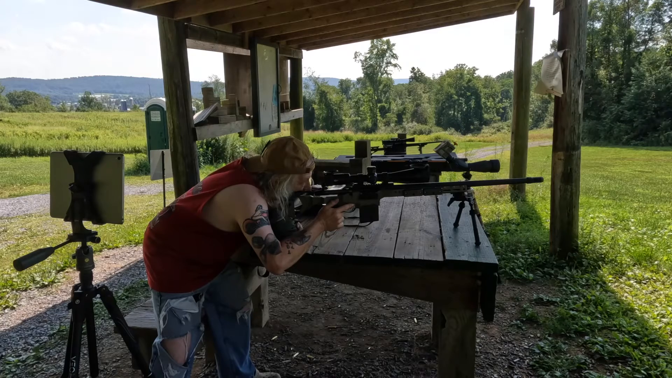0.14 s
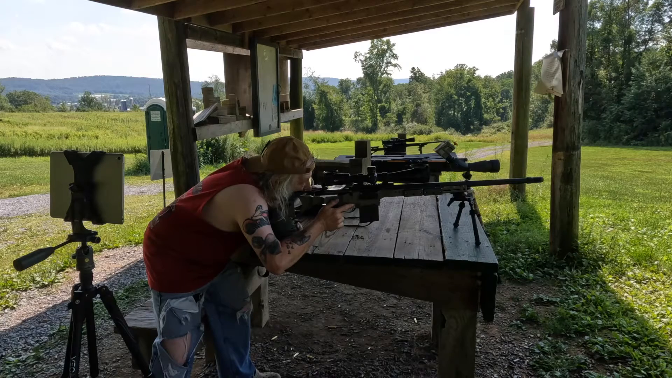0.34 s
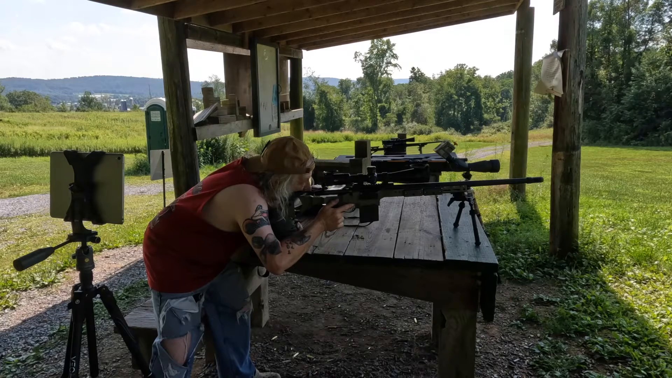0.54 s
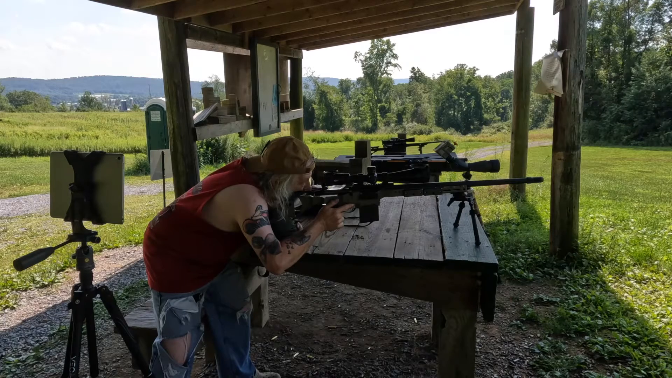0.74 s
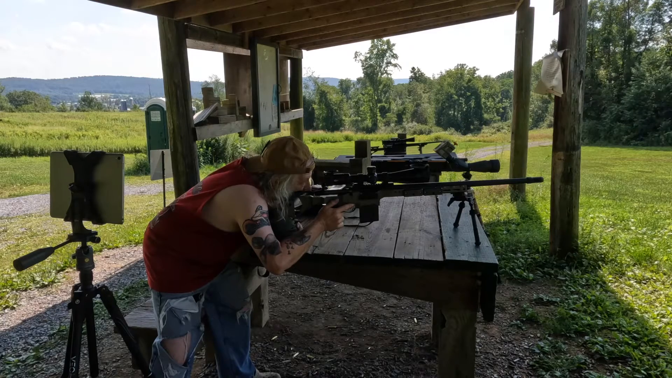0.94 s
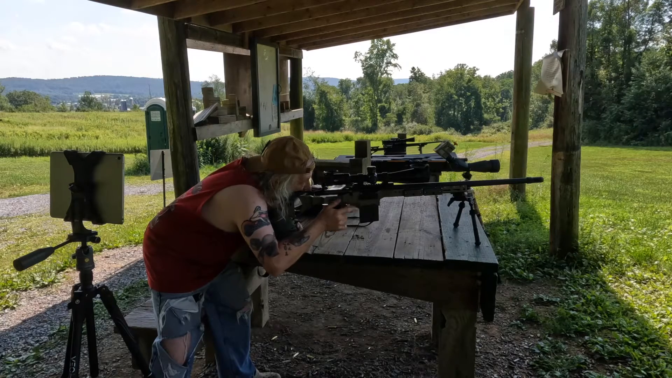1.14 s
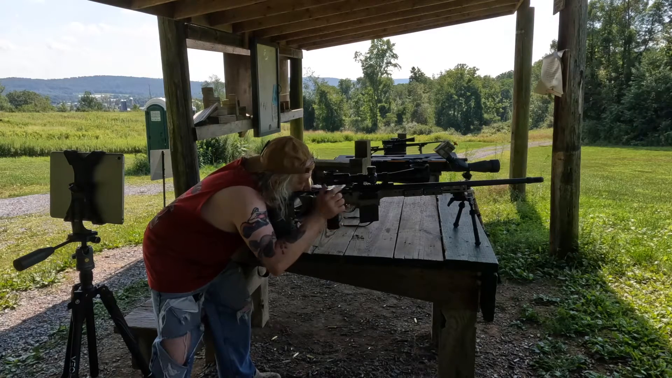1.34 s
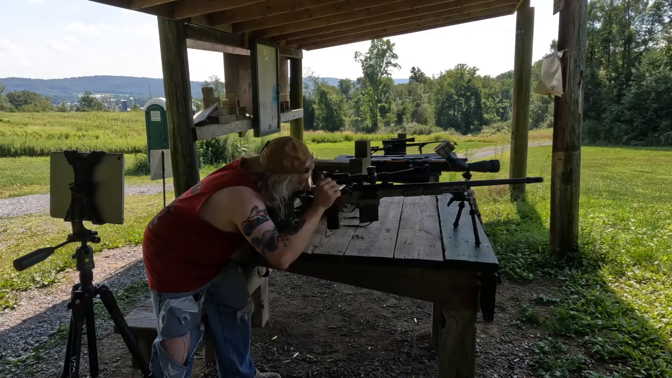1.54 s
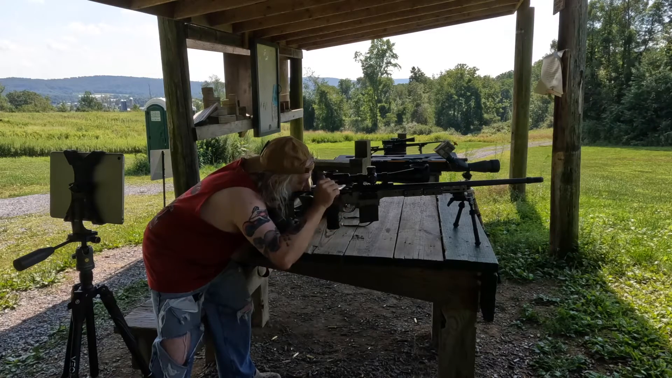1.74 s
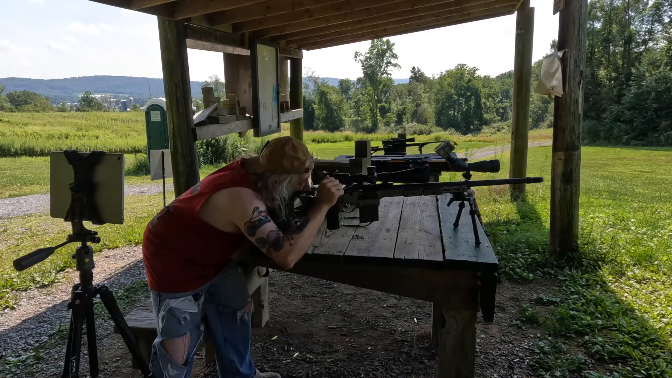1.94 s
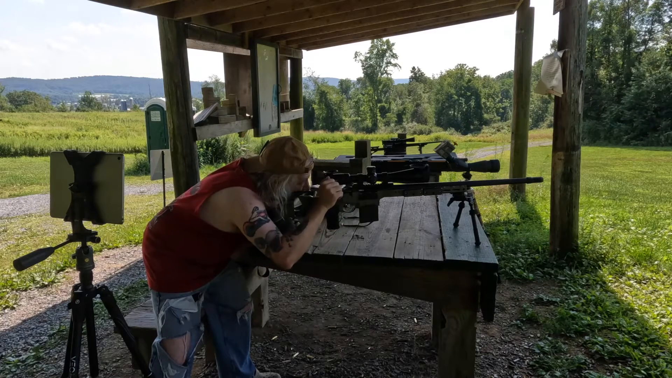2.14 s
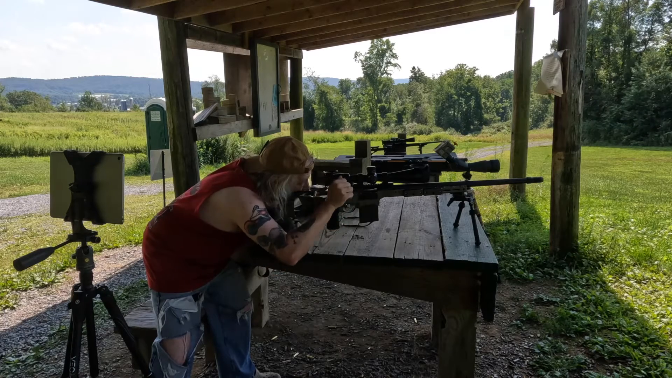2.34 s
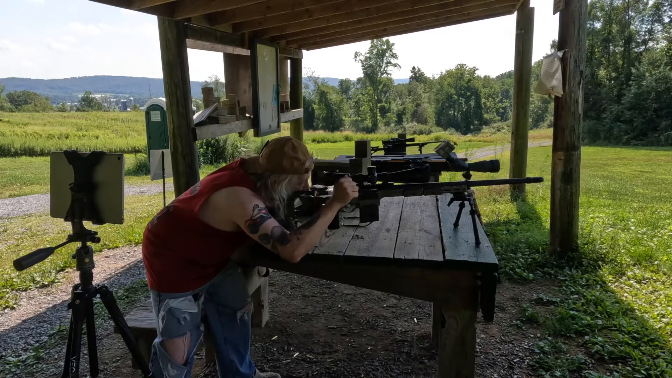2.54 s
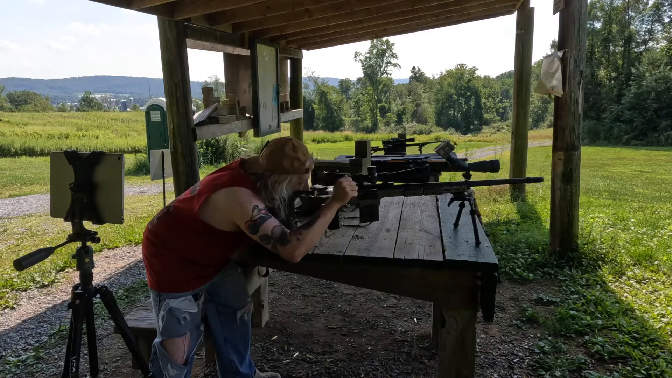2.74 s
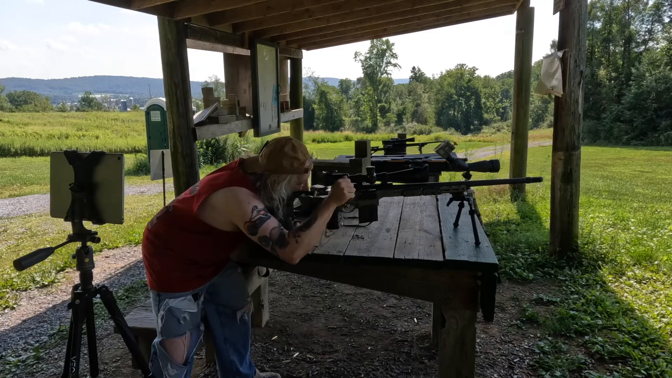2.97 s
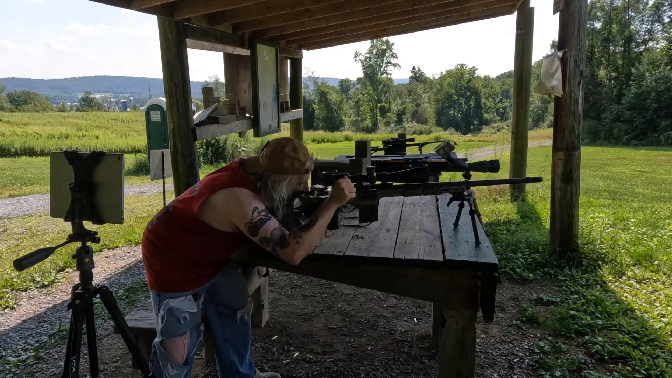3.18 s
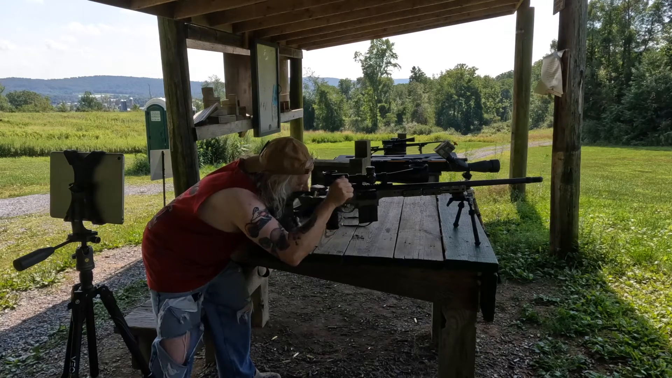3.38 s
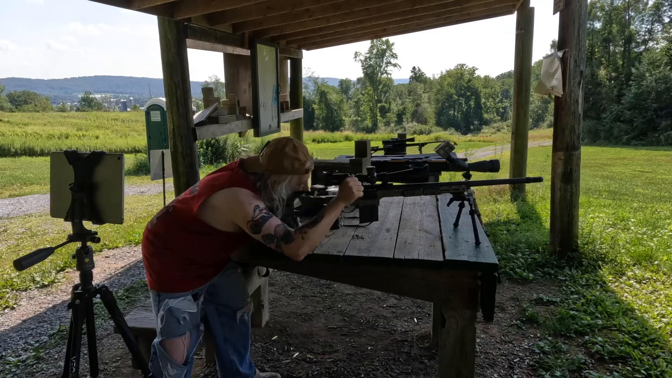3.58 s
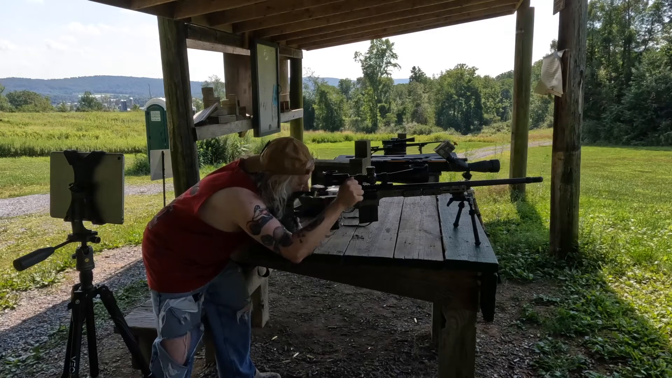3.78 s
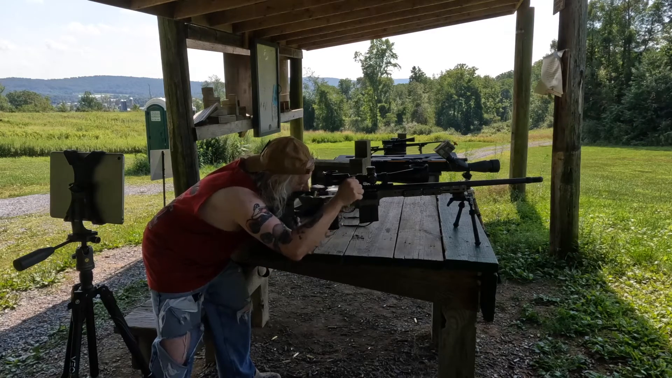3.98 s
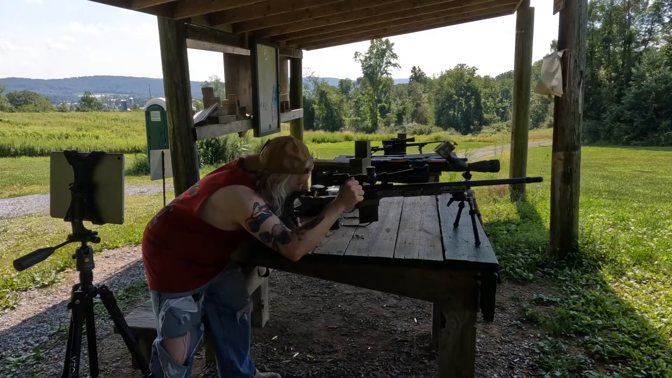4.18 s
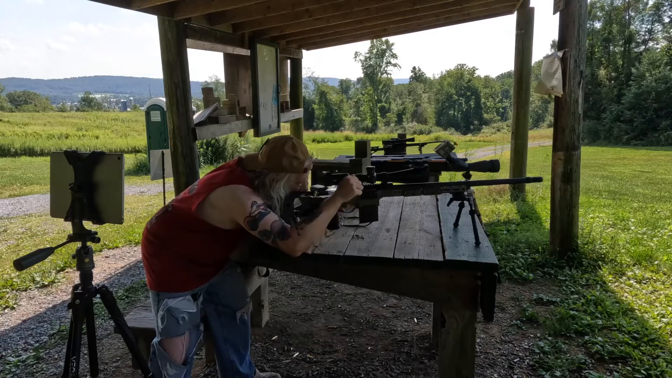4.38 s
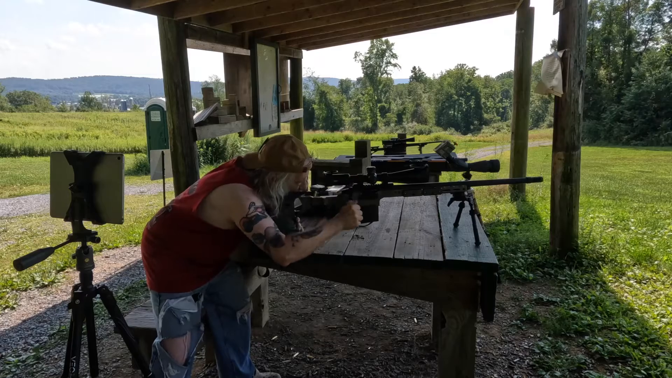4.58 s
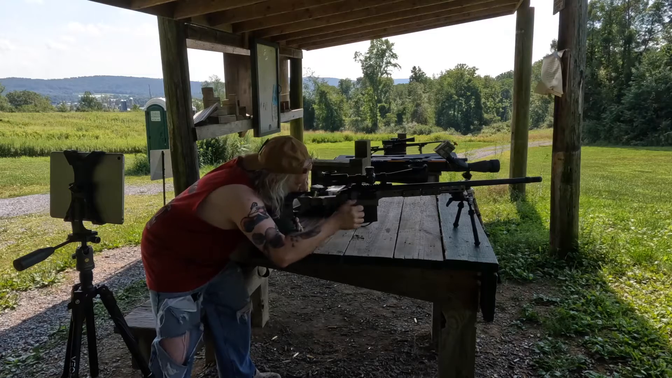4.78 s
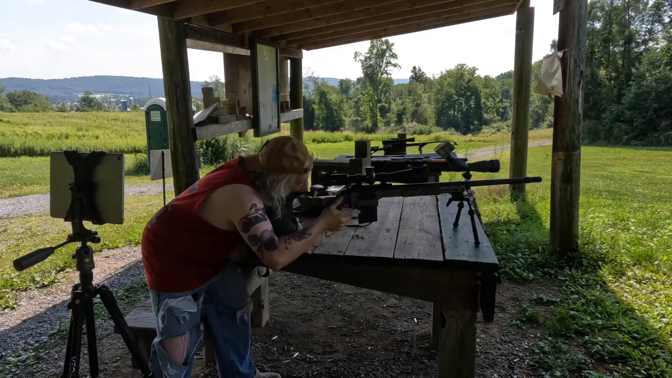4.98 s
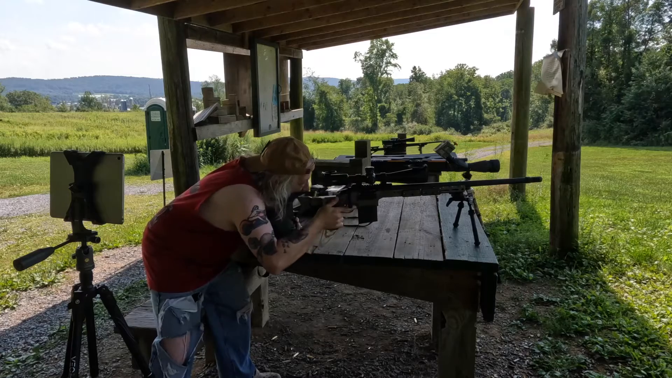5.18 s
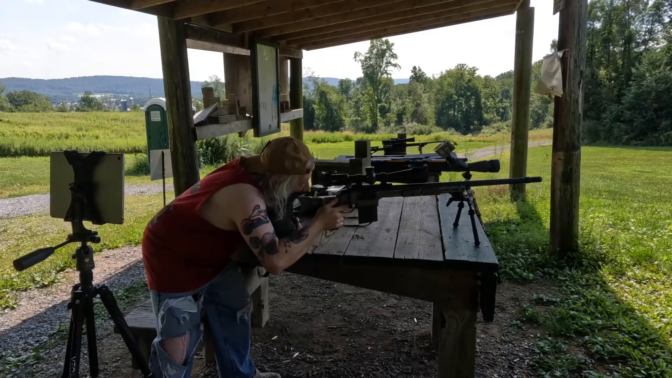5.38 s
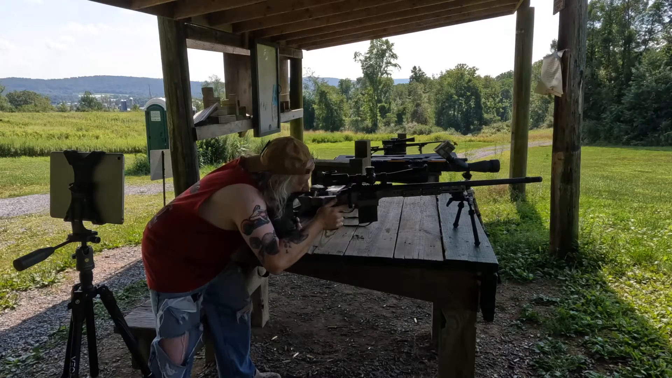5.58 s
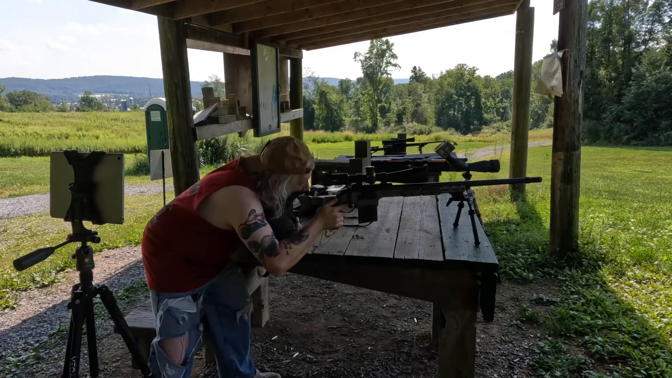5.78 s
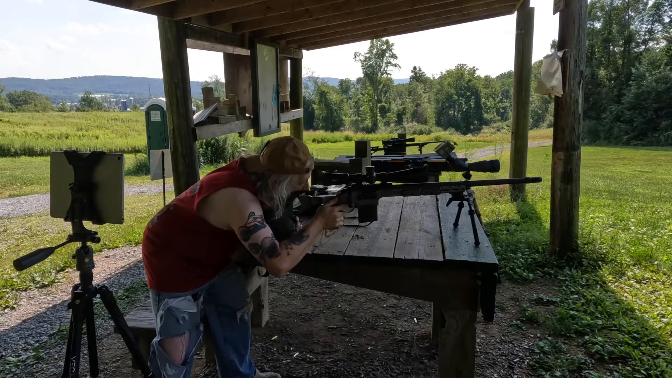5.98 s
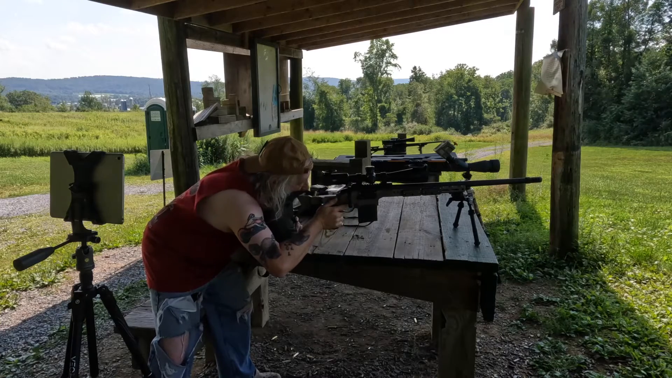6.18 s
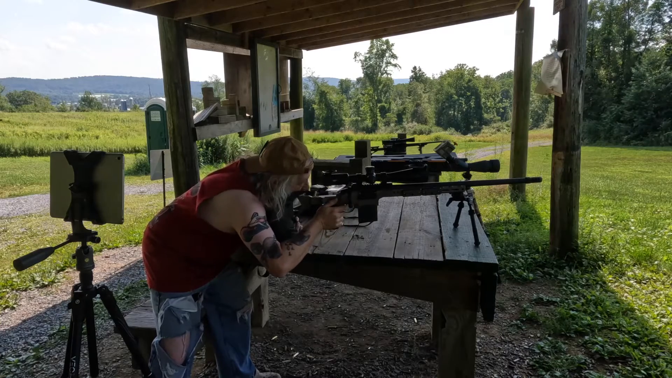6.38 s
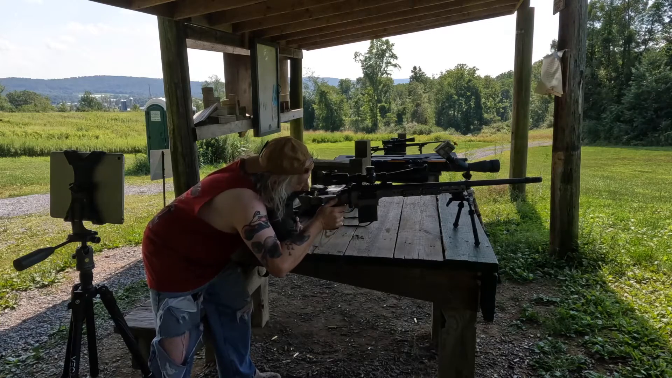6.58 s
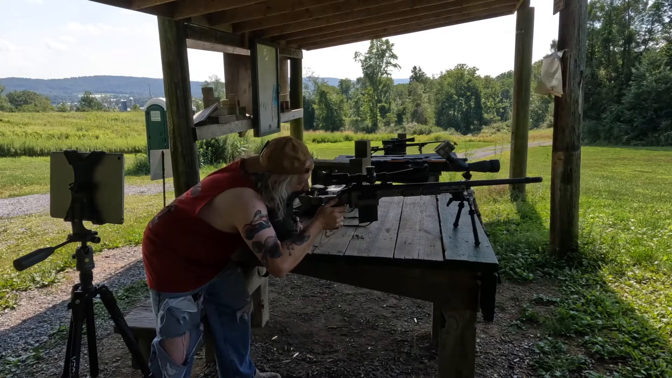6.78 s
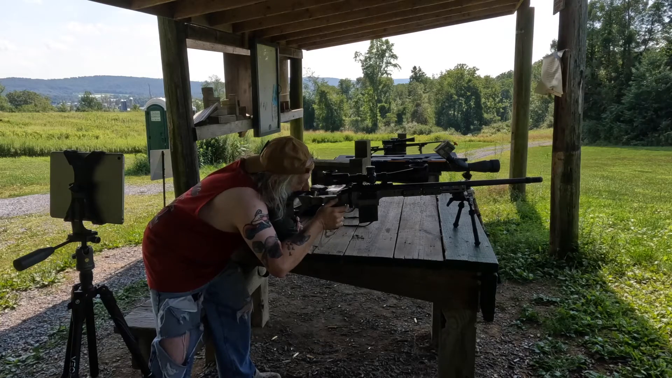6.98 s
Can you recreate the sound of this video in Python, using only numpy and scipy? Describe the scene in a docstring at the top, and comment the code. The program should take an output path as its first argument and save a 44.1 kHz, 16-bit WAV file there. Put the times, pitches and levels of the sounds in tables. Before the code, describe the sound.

In quiet open air, a few dull bumps sound on a wooden bench. A rifle bolt clicks up, slides back with a faint gritty hiss and rattles sharply against its stop. It is then pushed forward with a hard clack and locked with several more. Each nearby contact rings briefly and echoes under an open roof. Behind it, a small bird's faint falling whistles speed up, over a far engine and a soft insect buzz.

```python
"""Quiet open air, a far throbbing engine and a buzzing insect lie under dull bumps on a wooden bench.
At 1.9 s a rifle bolt is lifted by hand, then slides back, hissing, and rattles against its stop; each
steel contact cracks, rings the action and echoes under an open roof. From 2.8 s a small bird's falling
whistles speed up, while the bolt is pushed forward (3.5 s) and locked (4.7 s). After 6 s the hand
brushes the grip and one thin whistle falls far away."""
import sys
import numpy as np
from scipy import signal
from scipy.fft import rfft, irfft
from scipy.io import wavfile
from scipy.ndimage import uniform_filter1d

SR = 44100
rng = np.random.default_rng(int(sys.argv[2]) if len(sys.argv) > 2 else 0)


def pcm_store(signal):
    """Save signal as 16-bit PCM."""
    levels = np.round(np.clip(np.atleast_2d(signal), -1, 1) * 32767)
    wavfile.write(sys.argv[1], SR, levels.astype(np.int16).T)


N = 309582


def amp(db):
    return 10 ** (np.asarray(db) / 20)


def unit_rms(x):
    return x / np.sqrt(np.mean(x ** 2) + 1e-20)


def curve_at(points, hz):
    """A curve's value at hz, on a log-frequency axis."""
    f, value = np.transpose(points)
    return np.interp(np.log(hz + 1), np.log(f), value)


def fader(rows):
    """A dB curve over time as a gain for every sample."""
    return amp(np.interp(np.arange(N) / SR, *np.transpose(rows)))


def add(mix, s, sound):
    """Mixes a sound in, starting at s seconds."""
    part = mix[round(s * SR):][:len(sound)]
    part += sound[:len(part)]


def noise(eq):
    """Steady noise of rms 1, shaped by an EQ curve."""
    gain = amp(curve_at(eq, np.fft.rfftfreq(N, 1 / SR)))
    return unit_rms(irfft(rfft(rng.standard_normal(N)) * gain, N))


def wander(count, size):
    """Smooth random motion of rms 1 that changes over about size samples."""
    return unit_rms(uniform_filter1d(uniform_filter1d(rng.standard_normal(count), size), size))


# Soft, dark bed of open air: f/Hz, relative level/dB
AIR_EQ = [(20, -21), (50, -4.5), (115, -0.5), (300, -4), (550, -3.5), (1000, -8), (2500, -10),
          (4000, -15.5), (6300, -22), (8000, -21), (8700, -28.5), (9200, -45), (10800, -34.5), (13000, -58),
          (15000, -75)]
# Background level, ducking after the loud clacks and slowly recovering: t/s, level/dB before make-up gain
BACKGROUND_DUCKING = [(0.0, -55.5), (2.52, -54), (2.77, -56.5), (4.83, -54), (5.06, -56), (6.02, -53.5),
                      (7.02, -54.5)]
# Low rumble of the breeze: f/Hz, relative level/dB
BREEZE_EQ = [(25, -13), (60, -15), (110, -8), (200, 9), (500, -40), (3000, -90)]


def open_air(makeup_db=2.5, breeze_db=-69):
    """An even hiss of leaves and distance, with lumps of light breeze."""
    air = fader(BACKGROUND_DUCKING) * noise(AIR_EQ) * amp(makeup_db + 1.06 * wander(N, size=4000))
    breeze = noise(BREEZE_EQ) * amp(breeze_db + 3 * wander(N, size=2500))
    return air + breeze


# Muffled engine drone: f/Hz, relative level/dB
ENGINE_EQ = [(60, -44), (110, -10), (145, -8), (182, 2.5), (230, -2), (320, -8.5), (600, -15), (1500, -56),
             (6000, -90)]
# It sinks away until 3 s, then grows: t/s, level/dB
ENGINE_FADER = [(0, -59), (1.3, -64), (3.0, -80), (4.2, -64.5), (6.0, -55.5), (7.02, -54)]


def engine(beat_s=.1308, depth_db=2.5):
    """A far engine: low noise that throbs with each beat."""
    throb = amp(depth_db * np.cos(2 * np.pi * np.arange(N) / SR / beat_s))
    return fader(ENGINE_FADER) * throb * noise(ENGINE_EQ)


def insect(strokes_per_s=68, centre_hz=7630, width_hz=300, db=-74):
    """A buzz in the grass: each wing stroke is a short puff of narrow, high noise."""
    hz = np.fft.rfftfreq(N, 1 / SR)
    band = np.exp(-.5 * ((hz - centre_hz) / width_hz) ** 2)
    rasp = irfft(rfft(rng.standard_normal(N)) * band, N)
    strokes = np.cumsum(strokes_per_s * (1 + .01 * wander(N, size=8000))) / SR
    return amp(db) * unit_rms(rasp * np.sin(np.pi * strokes) ** 2)


# Dull thuds on the bench: t/s, level/dB, f/Hz
BENCH_BUMPS = [(0.173, -37.5, 145), (1.229, -42, 120), (1.679, -42.5, 106), (3.038, -42, 107),
               (4.485, -41.5, 130), (4.751, -35.5, 191)]


def bench(t60=.08):
    """Soft bumps briefly ring three low modes of the heavy wood."""
    out, t = np.zeros(N), np.arange(SR // 3) / SR
    attack = 1 - np.exp(-t / .0016)
    for s, db, hz in BENCH_BUMPS:
        phase = 2 * np.pi * hz * t
        wood = np.sin(phase) + .45 * np.sin(.72 * phase) - .46 * np.sin(1.5 * phase)
        add(out, s, amp(db - 60 * t / t60) * wood * attack)
    return out


def reverb_tail(t60s, rise_s):
    """Sparse reflections of random sign, each band dying at its own speed; energy 1."""
    taps = rng.choice([-1., 1.], SR) * (rng.random(SR) < 5000 / SR)
    hz, t, bands = signal.stft(taps, SR, nperseg=256)
    decay = amp(-60 * t / curve_at(t60s, hz)[:, None])
    tail = signal.istft(bands * decay, SR, nperseg=256)[1]
    tail *= 1 - np.exp(-np.arange(len(tail)) / SR / rise_s)
    return tail / np.linalg.norm(tail)


# Early reflections under the roof: delay t/s, level/dB
ROOF_SLAPS = [(.0034, -12), (.0058, -26.5), (.0112, -24), (.0245, -35), (.0290, -27.5)]
# Its reverb, longest in the lows: f/Hz, t60/s
ROOF_DECAY = [(200, 0.49), (600, 0.39), (1200, 0.25), (3000, 0.18), (6000, 0.15), (9000, 0.16),
              (14000, 0.18)]


def roof(x, wet_db=-4.5, side_db=-24):
    """Bench top, ground and roof throw back single echoes, then a short tail."""
    mid = amp(wet_db) * reverb_tail(ROOF_DECAY, rise_s=.0016)
    mid[0] += 1  # direct sound
    for delay, db in ROOF_SLAPS:
        mid[round(delay * SR)] += amp(db)
    # separately, a faint left-right difference in the highs
    side = amp(side_db) * np.diff(reverb_tail(ROOF_DECAY, rise_s=.0013), prepend=0)
    return np.array([signal.fftconvolve(x, mid + sign * side)[:N] for sign in (1, -1)])


def shelves(hz, weight_db, bright_db):
    """Low and high shelf in dB: heavy blows shake the whole rifle; hard, small contacts are brighter."""
    return weight_db / (1 + (hz / 1300) ** 4) + bright_db * (1 - 1 / (1 + (hz / 4300) ** 4))


# Bite of a steel crack: f/Hz, relative level/dB
CRACK_EQ = [(100, -31), (380, -19.5), (520, -12), (700, -2), (930, -10.5), (1250, 0.5), (1700, -4),
            (2900, 1.5), (4400, -1.5), (6800, -11.5), (9200, -31.5), (11000, -22.5), (12500, -35),
            (16000, -55)]


def crack(t60, weight_db, bright_db, snap=3.5, size=8192):
    """Steel meets steel: a snap and a crowd of short modes, too dense to tell apart."""
    t, hz = np.arange(size) / SR, abs(np.fft.fftfreq(size, 1 / SR))
    fade = amp(-60 * t / t60)
    blow = rng.standard_normal(size) * fade * amp(2.75 * wander(size, size=30))  # the faces chatter
    blow[0] += snap
    gain = amp(curve_at(CRACK_EQ, hz) + shelves(hz, weight_db, bright_db))
    causal_eq = np.exp(np.conj(signal.hilbert(np.log(gain))))  # minimum phase keeps the attack sharp
    steel = np.fft.ifft(np.fft.fft(blow) * causal_eq).real
    return unit_rms(steel) * np.sqrt(np.mean(fade ** 2))


def ringing(modes, t):
    """Sum of dying modes; neighbours swing in opposite directions."""
    return sum(amp(db - 60 * t / t60) * (-1) ** k * np.sin(2 * np.pi * hz * t)
               for k, (hz, db, t60) in enumerate(modes))


# Ring of receiver and barrel: f/Hz, relative level/dB, t60/s
ACTION_MODES = [(691, -31, 0.34), (1650, -22, 0.067), (2214, -19.5, 0.085), (2447, -26, 0.26),
                (2760, -51, 0.23), (3350, -23, 0.23), (3540, -39, 0.1), (4040, -24, 0.2),
                (4130, -36, 0.053), (4850, -24, 0.19), (5200, -42, 0.27), (6260, -34, 0.17)]
# The loose bolt's own close pair of modes: f/Hz, relative level/dB, t60/s
BOLT_MODES = [(1109, -4, .13), (1168, -12, .15)]


def action_ring(weight_db, bright_db, ring_db, t):
    """The lasting ring of receiver, barrel and bolt after a contact."""
    modes = [(hz, db + shelves(hz, weight_db, bright_db), t60) for hz, db, t60 in ACTION_MODES]
    return ringing(modes, t) + amp(ring_db) * ringing(BOLT_MODES, t)


# The main hits: lift (1.9 s), back stop (2.4 s), push forward (3.5 s), seat and lock (4.2-4.7 s).
# t/s, level/dB, t60/s, weight/dB, brightness/dB, bolt ring/dB, note f/Hz, note relative level/dB
BOLT_HITS = [ (1.9150, -24, 0.033, -9, 7, -12, 5280, 4), (1.9792, -27.5, .038, -6, 1, -11, 2214, -2.5),
             (2.4405, -31, .062, -15, -12, -11, 2280, 13.5), (2.4580, -15.5, 0.046, -6, -15, -13, 3900, -3),
             (2.4703, -11.5, 0.042, -6, -3, -17, 2930, -3), (2.4823, -7.5, 0.028, -2.5, 1.5, -5, 3320, -11),
             (2.5306, -22.5, .048, -14, 3, -17, 4840, -0.5), (2.5373, -19.5, 0.032, -9, -2, -3, 2464, 5.5),
             (3.536, -29.5, 0.026, -1.5, -10, 2.5, 2950, -2.5),
             (3.6008, -32.5, 0.033, -5, -7, 1, 1900, 5.5), (3.6353, -30, 0.042, 6, 4, 6, 3020, 4),
             (3.6971, -8, 0.029, -9, 5, -15, 2254, -6), (4.1684, -28.5, 0.02, -1, -8, -6.5, 2270, -2),
             (4.5243, -18, 0.018, -3.5, -2.5, -9, 3040, 2.5),
             (4.6787, -16, 0.029, -16, 6.5, -13, 4110, 0.5), (4.7322, -11, .032, -4.5, 2, -10, 3400, -5),
             (4.7360, -17, 0.014, -2, 4, -11, 840, -1), ]


def clacks(size=16384):
    """The bolt strikes the action, sounds the struck part's note and rebounds once, more weakly."""
    t = np.arange(size) / SR
    attack = 1 - np.exp(-t / .00058)
    for s, db, t60, weight_db, bright_db, ring_db, note_hz, note_db in BOLT_HITS:
        note = attack * ringing([(note_hz, note_db, t60)], t)
        hit = crack(t60, weight_db, bright_db, size=size) + note
        rebound = amp(-9) * crack(t60=.025, weight_db=2.5, bright_db=-.5)
        add(hit, .004, rebound)
        yield s, db, hit, attack * action_ring(weight_db, bright_db, ring_db, t)


# The draw of the bolt, steel sliding on steel: t/s, level/dB
SLIDE_FADER = [(1.95, -74.5), (2.02, -58), (2.12, -55.5), (2.25, -56.5), (2.38, -56), (2.44, -58),
               (2.5, -73)]
# Its grit: f/Hz, relative level/dB
SLIDE_EQ = [(300, 8), (1200, -8), (2800, 5), (4800, -0.5), (5800, 6.5), (6500, -0.5), (8200, -10),
            (9200, -24), (11000, -24), (15000, -49)]
# Its thin squeal: f/Hz, relative level/dB
SLIDE_TONES = [(4400, -17), (5420, -7), (5620, -17), (5800, -9), (6000, -11), (7150, -15)]


def slide(sag_per_s=.1, waver=.008):
    """Gritty hiss of the bolt drawn back, with raspy tones that waver and sink as it slows."""
    t = np.arange(N) / SR
    middle_s = np.mean(SLIDE_FADER, axis=0)[0]
    speed = 1 - sag_per_s * (t - middle_s) + waver * wander(N, size=2500)
    squeal = np.zeros(N)
    for hz, db in SLIDE_TONES:
        pitch = hz * speed + 30 * wander(N, size=100)
        squeal += amp(db + 3 * wander(N, size=2000)) * np.sin(2 * np.pi * np.cumsum(pitch) / SR)
    return fader(SLIDE_FADER) * (noise(SLIDE_EQ) + squeal) * amp(1.1 * wander(N, size=200))


def touch(t60, weight_db, bright_db, ring_db):
    """A light contact: a crack and a ring, with no rebound."""
    hit = crack(t60, weight_db, bright_db)
    return hit, action_ring(weight_db, bright_db, ring_db, np.arange(len(hit)) / SR)


# Small handling ticks: t/s, level/dB
HANDLING_TICKS = [(2.183, -43.5), (2.343, -46.5), (3.078, -48), (3.4938, -42.5), (3.908, -46.5),
                  (4.161, -38), (4.274, -46.5), (4.294, -44.5), (4.509, -41.5), (4.653, -40.5),
                  (6.303, -51.5)]


def ticks():
    """Loose parts tick lightly under the hand."""
    for s, db in HANDLING_TICKS:
        yield s, db, *touch(t60=.076, weight_db=-2, bright_db=-1, ring_db=-4.5)


# Bursts of chatter: t/s, length/s, level/dB of each contact
RATTLE_BURSTS = [(2.434, .006, -37.5), (2.461, .02, -22), (3.645, .032, -30.5)]


def rattles(per_s=250, spread_db=2.5):
    """The bolt chatters in its raceway: quick, uneven runs of light contacts."""
    for start, length, burst_db in RATTLE_BURSTS:
        for beat in np.arange(start, start + length, 1 / per_s):
            s = beat + .5 * rng.random() / per_s
            db = burst_db + spread_db * rng.uniform(-1, 1)
            yield s, db, *touch(t60=.033, weight_db=3, bright_db=1, ring_db=-2)


def bolt():
    """Two stems: the slide with the cracks of all contacts, and the ringing steel."""
    cracks, rings = slide(), np.zeros(N)
    for s, db, hit, ring in [*clacks(), *ticks(), *rattles()]:
        add(cracks, s, amp(db) * hit)
        add(rings, s, amp(db) * ring)
    return cracks, rings


# Bird notes that quicken like a bouncing ball: t/s, starting f/Hz
BIRD_NOTES = [(2.76, 3620), (3.259, 3990), (3.679, 3750), (4.035, 3890), (4.362, 3830), (4.585, 3920),
              (4.76, 3920), (4.911, 3950), (5.068, 3920), (5.195, 3920), (5.312, 3880), (5.42, 3890),
              (5.528, 4020), (5.648, 3920), (5.768, 3960)]


def bird(end_hz=2850, gap_share=.56, swell_s=2.24, hook=1.7):
    """Pure whistles hold their pitch, then fall and fade; the trees double and smear them."""
    song = np.zeros(N)
    starts = np.transpose(BIRD_NOTES)[0]
    gaps = np.diff(starts)
    for (s, top_hz), length in zip(BIRD_NOTES, gap_share * np.append(gaps, gaps[-1])):
        db = np.interp(s - starts[0], [0, swell_s], [-66, -56])  # the song swells, then holds
        progress = np.linspace(0, 1, round(length * SR))
        count = len(progress)
        fall = progress ** (1 + hook * min(1, .12 / length) ** 2)  # long notes slide, short ones hook
        hz = (top_hz + (end_hz - top_hz) * fall) * (1 + .006 * wander(count, size=100))
        envelope = signal.windows.tukey(count, .15) * amp(db - 2 * fall + 2 * wander(count, size=400))
        add(song, s, envelope * np.sin(2 * np.pi * np.cumsum(hz) / SR))
    trees = reverb_tail([(2000, .36), (5000, .11)], rise_s=.0033)
    heard = song + signal.fftconvolve(song, trees)[:N]
    add(heard, .017, amp(-4) * song)  # one close echo
    return heard


# Airy brush of the hand settling on the grip: f/Hz, relative level/dB
RUSTLE_EQ = [(500, -20), (3000, -4), (5500, 2), (8000, -2), (9200, -20), (11000, -6), (12200, -20),
             (13000, -17), (14500, -40)]


def rustle(start_s=6.05, rise_s=.15, fade_s=.55, db=-61.5):
    """Skin and cloth brush the stock: a soft, high hiss that rises and dies away."""
    envelope = np.interp(np.arange(N) / SR - start_s, [0, rise_s, rise_s + fade_s], [0, 1, 0])
    return envelope * noise(RUSTLE_EQ) * amp(db + 2 * wander(N, size=400))


def peep(start_s=6.37, length_s=.2, top_hz=6300, fall_hz_per_s=2900, db=-66):
    """One thin, far whistle that swells, sinks evenly and fades."""
    out, t = np.zeros(N), np.arange(0, length_s, 1 / SR)
    hz = top_hz - fall_hz_per_s * t + 30 * wander(len(t), size=100)
    envelope = amp(db) * signal.windows.tukey(len(t), .5)
    add(out, start_s, envelope * np.sin(2 * np.pi * np.cumsum(hz) / SR))
    return out


def scene():
    """Cracks, slide and bumps raise the roof's echo; the soft ring and the rest are heard directly."""
    background = open_air() + engine() + insect() + bird() + rustle() + peep()
    cracks, rings = bolt()
    return roof(bench() + cracks) + rings + background


def record(dry, hiss_db=-112, cutoff_hz=15800):
    """Each microphone adds faint hiss; the loudest snaps round off; a low-pass trims the top."""
    heard = dry + amp(hiss_db) * rng.standard_normal(dry.shape)
    rounded = heard / (1 + heard ** 6) ** (1 / 6)
    lowpass = signal.firwin(511, cutoff_hz, window=("kaiser", 9), fs=SR)
    return signal.oaconvolve(rounded, lowpass[None], "same")


dry = scene()
out = record(dry)
pcm_store(out)
```